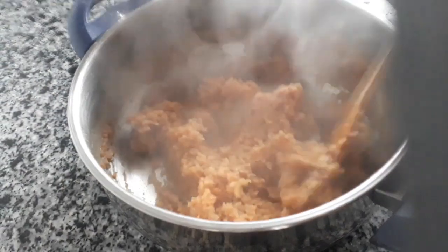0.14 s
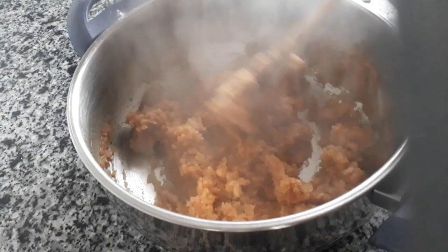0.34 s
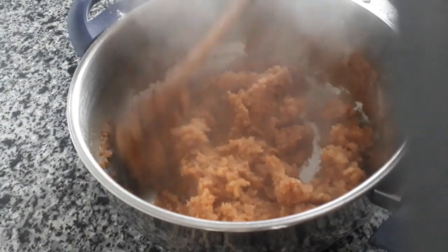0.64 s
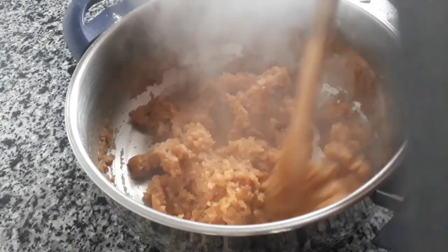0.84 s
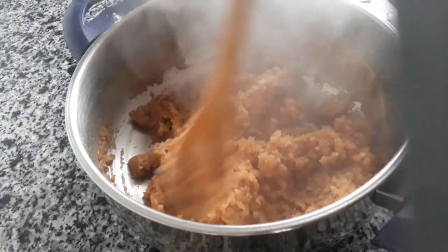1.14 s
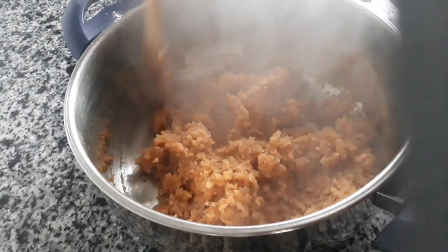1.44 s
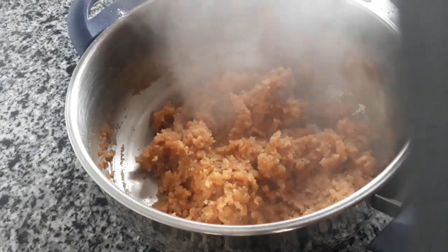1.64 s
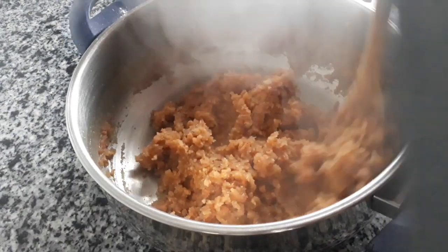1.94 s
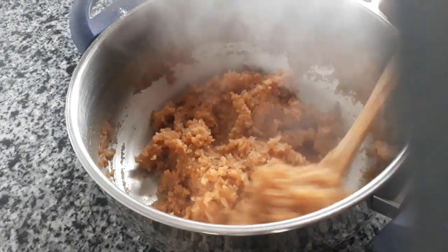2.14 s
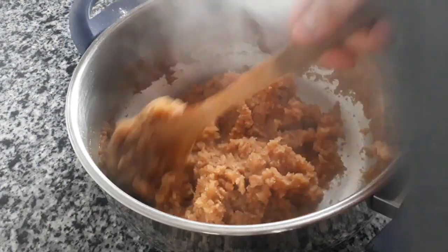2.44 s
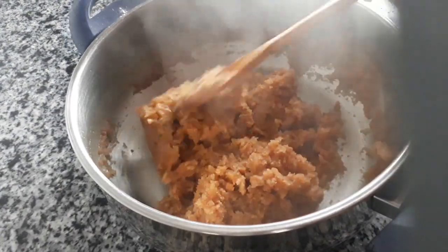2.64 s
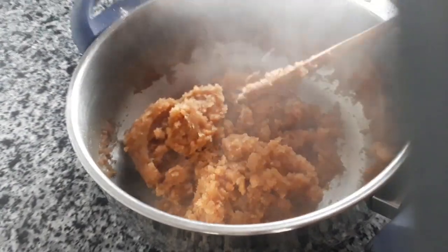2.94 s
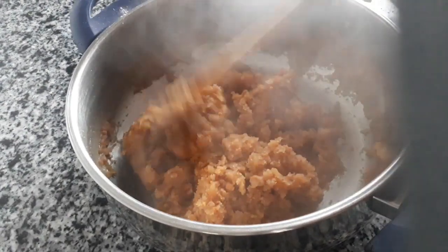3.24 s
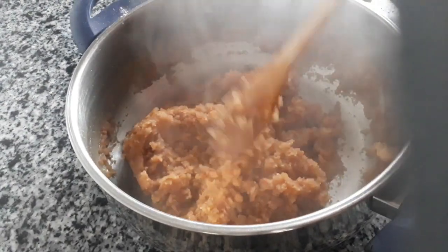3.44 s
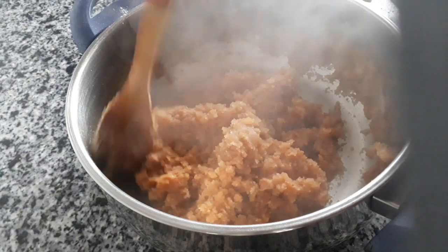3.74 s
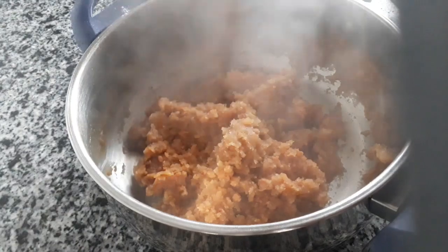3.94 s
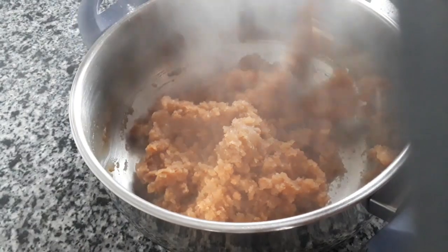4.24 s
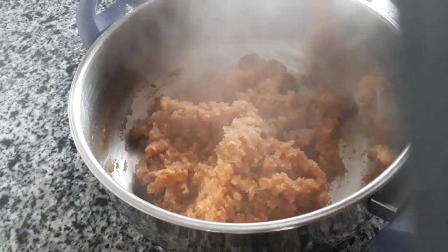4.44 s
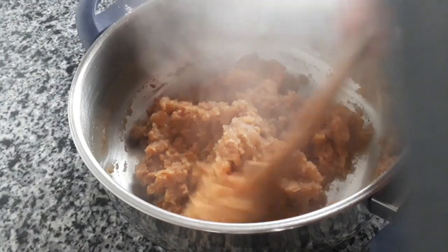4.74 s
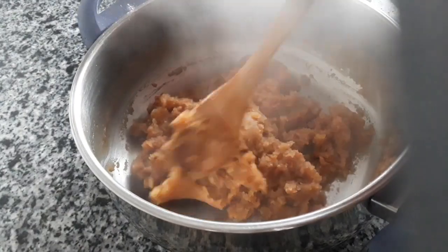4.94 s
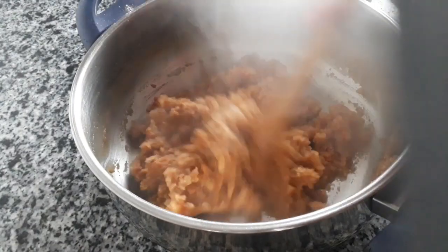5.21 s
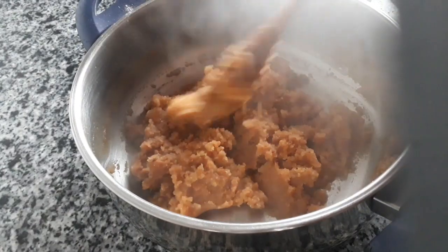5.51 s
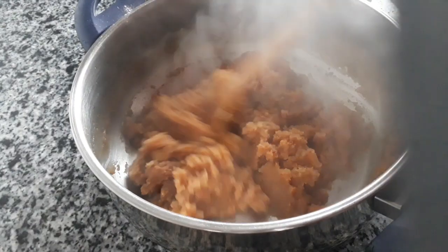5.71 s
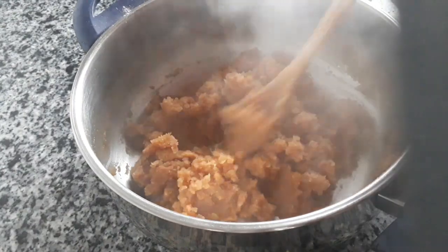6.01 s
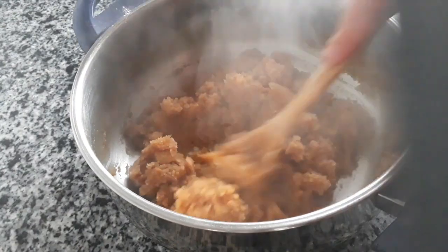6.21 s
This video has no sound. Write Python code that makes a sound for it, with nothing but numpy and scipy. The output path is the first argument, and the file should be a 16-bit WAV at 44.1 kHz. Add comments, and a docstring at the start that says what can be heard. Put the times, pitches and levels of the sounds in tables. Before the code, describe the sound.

A wooden spoon stirs thick, faintly sizzling food in a steel pot, with dull knocks and one ringing rap on the rim.

```python
"""Soft, dull knocks and a sticky rustle come first: a wooden spoon stirs thick, steaming food in a
stainless steel pot on a stone counter, in a small kitchen with hard walls. The food muffles the
knocks on the pot's wall. One rap on the bare rim, to shake off a lump, clangs and leaves the steel
ringing; then the spoon scrapes along the side and stirs on. All the while the food rustles, hisses
on the hot steel and pops faintly, with thin whistles of steam over a quiet room."""
import sys
import numpy as np
from scipy import signal
from scipy.fft import rfft, irfft
from scipy.io import wavfile
from scipy.ndimage import map_coordinates

SR = 44100
rng = np.random.default_rng(int(sys.argv[2]) if len(sys.argv) > 2 else 0)


def inscribe(sig):
    """Save sig as 16-bit PCM at rate SR to the path in sys.argv[1].

    A 1-D sig is mono; a 2-D sig holds one channel per row.
    Samples are clipped to [-1, 1] before scaling.
    """
    pcm = np.round(np.clip(np.atleast_2d(sig).T, -1, 1) * 32767)
    wavfile.write(sys.argv[1], SR, pcm.astype(np.int16))


N = 280917
T = np.arange(int(SR * .7)) / SR  # the clock for one short sound [s]

# Each knock on the wall; the spot struck sets how strong each of the wall's four tones is:
# (time [s], thud level [dB], thud pitch [ratio], tone 1 [dB], tone 2 [dB], tone 3 [dB], tone 4 [dB],
#  crack level [dB], room echo [dB])
WALL_KNOCKS = [(0.2038, -49, 0.96, -60.5, -51.5, -59.5, -65, -68, -7.5),
               (0.582, -53.5, 0.72, -99, -68, -52.5, -66, -50, -14),
               (0.7691, -46.5, 0.97, -49, -62.5, -86, -73, -63.5, -8.5),
               (1.2828, -47, 1.005, -53.5, -72, -81, -89, -72, -6),
               (3.712, -53.5, 1.06, -55, -53.5, -56.5, -56.5, -50.5, -7),
               (3.8458, -55, 0.8, -80, -77, -96, -91, -77, -13),
               (4.426, -37.5, 1.02, -41, -42, -46, -47, -60, -6.5),
               (5.1484, -41.5, 1.035, -48.5, -49.5, -57.5, -67.5, -67.5, -8),
               (6.181, -68.5, 1.1, -84, -99, -93, -82, -87, -13)]
# The wall's tones, cut short by the food: (pitch [Hz], time to fade by 60 dB [s])
WALL_TONES = [(735, 0.026), (1090, 0.012), (1590, 0.011), (2150, 0.0019)]
# The tone colour of wood cracking on steel, before tilting: (frequency [Hz], level [dB])
CRACK_COLOUR = [(1500, -18), (3700, -13), (4650, -2.5), (5400, -3.5), (6700, 2), (9500, -7.5),
                (11500, -0.5), (15500, -13)]
# The wooden spoon's own tones: (base pitch [Hz], relative level [dB], fade time [s])
SPOON_TONES = [(2313, -2, 0.011), (2850, 1, 0.0058), (3860, -5.5, 0.0062)]
def knocks():
    """The spoon hits the wall: the steel rings briefly, the wood cracks, and the pot's base thuds."""
    out = np.zeros(N)
    for time, thud_db, thud_pitch, *wall_db, crack_db, room_db in WALL_KNOCKS:
        wall = sum(amp(db) * ring([(hz, 0, fade)], attack=0.0013)
                   for (hz, fade), db in zip(WALL_TONES, wall_db))
        add(out, time, kitchen(wall, room_db))
        tilt = 0.44 * (crack_db + 50)  # dB per octave: a harder hit sounds brighter
        spectrum = [(hz, db + tilt * np.log2(hz / CRACK_COLOUR[0][0])) for hz, db in CRACK_COLOUR]
        add(out, time, amp(crack_db) * crack(spectrum, fade=0.02, room_db=room_db + 12.5, pot_db=8.5))
        # the spoon's clack is louder when the wall's highest tone is
        clack = amp(wall_db[-1] - 3.5) * ring(SPOON_TONES, attack=0.00032, pitch=0.846)
        add(out, time + 0.002105, kitchen(clack, room_db))
        jolt = amp(thud_db) * thud(attack=0.0027, pitch=thud_pitch)
        add(out, time + 0.00582, kitchen(jolt, room_db + 0.5))
    return out


# The rap on the rim and its bounce:
# (time [s], clang level [dB], clack level [dB], ring level [dB], thud level [dB], thud delay [s])
RIM_RAPS = [(2.9182, -28, -49.5, -41.5, -34, .0065), (2.9843, -42.5, -41, -69.5, -33.5, -.0045)]
# The tone colour of the clang: (frequency [Hz], level [dB])
CLANG_COLOUR = [(100, -34), (550, -1), (850, -8), (1200, -5), (1700, -3.5), (2350, 1.5), (2750, -5.5),
                (3100, -13.5), (3900, -18), (5200, -9), (6500, -9), (8000, -17), (9700, -24.5),
                (15000, -31)]
# The long tones of the pot's steel shell: (pitch [Hz], relative level [dB], fade time [s])
SHELL_TONES = [(149.4, -4, 0.29), (248, 3, 0.46), (354, -8.5, 0.65), (438, 6, 0.2), (728, 7.5, 0.4),
               (1086, -5, 0.35), (1330, -22, 0.51), (1863, -6, 0.18), (2030, -7, .3), (2025, -11, .33),
               (2160, -23, .4), (2230, -23, .27), (2530, -3, 0.28), (2355, -5, 0.23), (2760, -17, .28),
               (5730, -19.5, .2), (5666, -12, .22), (6090, -1, 0.17)]
def rim_raps():
    """The bare rim clangs and sets the whole shell ringing while the pot jolts on the counter."""
    out = np.zeros(N)
    for time, clang_db, clack_db, shell_db, thud_db, delay in RIM_RAPS:
        clang = amp(clang_db) * crack(CLANG_COLOUR, fade=0.041, room_db=1, pot_db=1)
        clack = amp(clack_db) * ring(SPOON_TONES, attack=0.00071)
        shell = amp(shell_db) * ring(SHELL_TONES, attack=0.009)
        add(out, time, clang + kitchen(clack, room_db=-7.5) + shell)
        jolt = amp(thud_db) * thud(attack=0.0036, pitch=0.98)
        add(out, time + delay, kitchen(jolt, room_db=-3.5))
    # the first hit also booms in the counter
    boom = amp(-37) * ring([(146, 6.5, 0.14), (162, -5.5, 0.066), (263.5, -6, 0.25)], attack=0.0016)
    add(out, RIM_RAPS[0][0] + .002, kitchen(boom, room_db=-9))
    return out


def crack(spectrum, fade, room_db, pot_db):
    """A hard hit makes one sharp click, then quick echoes inside the pot, then the room's echo."""
    click = np.arange(len(T)) == round(.0006 * SR)
    echoes = burst(fade) * (1 - np.exp(-T / .0008))
    in_pot = amp(pot_db) * echoes / np.linalg.norm(echoes)
    return unit_hit(colour(click + in_pot + amp(room_db) * room_echo(), spectrum))


# The full pot rocking on its base: (base pitch [Hz], relative level [dB], fade time [s])
ROCKING_TONES = [(102.4, -36, 0.6), (162.3, -21, 0.096), (271.7, -17.5, 0.13), (361, 1.5, 0.023),
                 (408, -2, 0.028)]
def thud(attack, pitch):
    """The pot rocks back and forth quickly: a short thud with little deep bass."""
    rocking = ring(ROCKING_TONES, attack, pitch)
    return unit_hit(signal.sosfilt(signal.butter(2, 110, "high", fs=SR, output="sos"), rocking))


# The spoon's pushes along the wall: (loudest time [s], length [s], rub level [dB], grit level [dB])
SCRAPE_PUSHES = [(3.781, 0.024, -67, -57), (3.86, 0.042, -65, -64.5), (3.896, 0.014, -75, -63),
                 (3.987, 0.18, -66, -72), (4.052, 0.021, -62, -63), (4.097, .055, -63.5, -66)]
# The tone colour of the low rubbing: (frequency [Hz], level [dB])
RUB_COLOUR = [(100, -8), (250, -4.5), (400, 3.5), (580, -10.5), (750, -7.5), (1100, -13.5), (1550, -9),
              (2000, -14.5), (2800, -14.5), (4500, -42), (8000, -50)]
# The tone colour of the gritty crust: (frequency [Hz], level [dB])
GRIT_COLOUR = [(1760, -52), (2900, -11), (3650, -11), (4470, -14.5), (5960, -5.5), (7380, -5.5),
               (7800, -10), (8880, -7.5), (9710, -15), (11000, -11.5), (14800, -16), (15500, -15.5)]
def scrape():
    """The spoon's edge sticks and slips over the crust on the wall, making the shell ring faintly."""
    time, length, *levels = np.transpose(SCRAPE_PUSHES)
    rub_gain, grit_gain = [swells(zip(time, length, db), fall=0.77) for db in levels]
    rub = rub_gain * grains(RUB_COLOUR, per_second=1200, spread_db=-0.5)
    grit = grit_gain * grains(GRIT_COLOUR, per_second=11000, spread_db=2.5)
    tones = ring(SHELL_TONES, attack=0.0012)
    shell = signal.fftconvolve(grit + 0.47 * rub, tones / np.linalg.norm(tones))[:N]
    return kitchen(rub + grit, room_db=-8.5) + amp(-15) * shell


# The spoon's strokes through the food:
# (middle time [s], length [s], relative churn [dB], relative rustle [dB], relative hiss [dB])
STIR_STROKES = [(0.02, 0.11, -67.5, -77.5, -78), (0.293, 0.19, -70, -78, -76),
                (0.718, 0.33, -64.5, -74.5, -73.5), (0.953, 0.11, -87, -83, -75.5),
                (1.136, 0.13, -66.5, -76, -96), (1.564, 0.33, -70, -74.5, -77),
                (1.79, 0.17, -62.5, -73.5, -80), (1.996, 0.13, -61.5, -69.5, -74),
                (2.454, 0.17, -65, -77.5, -72), (2.654, 0.1, -62.5, -74, -67.5),
                (3.394, 0.17, -72, -85, -76), (4.277, 0.43, -69.5, -76.5, -78.5),
                (4.499, 0.028, -75, -66, -63), (4.6, 0.071, -66, -70, -72), (4.898, .17, -74, -72, -71.5),
                (5.308, 0.15, -69, -69.5, -70), (5.586, .1, -69, -78.5, -95), (5.85, 0.23, -68, -76, -73),
                (6.335, 0.29, -72.5, -78.5, -76)]
# The tone colour of the thick food churning: (frequency [Hz], level [dB])
CHURN_COLOUR = [(41, -48), (70, -4), (107, 2), (372, -9), (570, -12.5), (718, -7.5), (874, -18),
                (1100, -14), (1430, -42.5), (2420, -120)]
# The tone colour of its grains rustling: (frequency [Hz], level [dB])
RUSTLE_COLOUR = [(470, -33.5), (800, -8), (1350, 0.5), (1500, -0.5), (2140, -6), (2700, -2.5),
                 (5500, -10.5), (7150, -37), (12100, -120)]
# The tone colour of wet food on hot steel: (frequency [Hz], level [dB])
HISS_COLOUR = [(2350, -21), (4000, -13), (5280, -10), (5980, -1.5), (7130, -2.5), (8890, -5.5),
               (9570, -11.5), (11500, -6.5), (14900, -8), (15500, -6)]
def stirring():
    """With each stroke the food churns, rustles, and hisses and crackles on freshly bared hot steel."""
    time, length, *levels = np.transpose(STIR_STROKES)
    resting_db = (-74, -82.5, -81.5)  # relative churn, rustle and hiss between strokes
    churn_gain, rustle_gain, hiss_gain = [np.hypot(amp(rest), swells(zip(time, length, db)))
                                          for db, rest in zip(levels, resting_db)]
    churn = amp(-7.5) * churn_gain * grains(CHURN_COLOUR, per_second=240, spread_db=-2.5)
    rustle = amp(-2.5) * rustle_gain * grains(RUSTLE_COLOUR, per_second=3000, spread_db=1)
    sizzle = amp(-1.5) * grains(HISS_COLOUR, per_second=12000, spread_db=2.6)
    crackle = amp(-4.5) * grains(HISS_COLOUR, per_second=320, spread_db=1)
    return kitchen(churn + rustle + hiss_gain * (sizzle + crackle), room_db=-5)


# Small sticky pops: (time [s], peak level [dB], pitch [Hz], life [cycles], snap against tone [dB])
FOOD_POPS = [(0.021, -58, 5700, 1.7, -3), (0.4503, -42.5, 2340, 0.41, 7.5), (1.346, -41.5, 2850, 0.73, -24),
             (1.462, -53, 13000, 2, -14), (1.746, -52, 6100, 0.69, -9), (1.786, -52, 1790, 0.37, 6),
             (2.382, -48.5, 860, 0.53, -4), (2.52, -56, 4660, 3, -22), (2.571, -54, 4740, 1.7, -6),
             (3.1852, -45, 4090, 2, -11), (3.1872, -48.5, 7330, 5.9, -3), (4.039, -49, 5900, 2.8, -8),
             (4.805, -52, 3540, 2.2, -17), (5.778, -56.5, 2010, .7, -8), (6.22, -45, 1330, 1.3, -26)]
# The tone colour of a pop's snap: (frequency [Hz], level [dB])
SNAP_COLOUR = [(1000, -23), (1600, 6.5), (3600, -6), (4400, -11), (5500, 3), (6600, -28), (7400, -1.5),
               (9000, -23), (10800, -10), (15000, -14)]
def pops():
    """Little pockets of steam in the sticky food snap open, each with a very short tone."""
    out = np.zeros(N)
    for time, db, hz, cycles, snap_db in FOOD_POPS:
        fading = np.exp(-T * hz / cycles)
        pocket = np.sin(2 * np.pi * hz * T) * fading * (1 - fading)
        snap = colour(burst(fade=0.0039), SNAP_COLOUR)
        pop = unit_hit(pocket) + amp(snap_db) * unit_hit(snap)
        add(out, time, amp(db) * pop / np.abs(pop).max())
    return kitchen(out, room_db=-15)


# The tone colour of seeping steam: (frequency [Hz], level [dB])
STEAM_COLOUR = [(2500, -28), (3400, -12), (3700, -3), (4050, -18), (6000, -13), (6600, -3), (7300, 0),
                (7800, -9), (9000, -28)]
# Thin whistles of steam: (middle time [s], length [s], level before wavering [dB], pitch [Hz])
STEAM_WHISTLES = [(0.398, 0.066, -78.5, 7000), (0.425, 0.18, -82, 3650), (0.507, 0.04, -72, 7000),
                  (0.685, 0.22, -80, 6930), (1.15, 0.42, -86.5, 7060), (1.237, 0.1, -81.5, 3660),
                  (1.92, 0.25, -81, 2770), (4.91, .14, -79, 6360), (5.35, 0.19, -77.5, 7240),
                  (5.887, 0.082, -76, 7200)]
def steam():
    """Steam seeps out under the food and now and then squeezes through a gap in a wavering whistle."""
    out = amp(-87.5) * grains(STEAM_COLOUR, per_second=5200, spread_db=8.5)
    width = 0.032  # a whistle is noise within this share of its pitch, either side
    for time, length, db, hz in STEAM_WHISTLES:
        band = signal.butter(2, [hz * (1 - width), hz * (1 + width)], "band", fs=SR, output="sos")
        whistle = signal.sosfilt(band, rng.standard_normal(N))
        out += swells([(time, length, db)]) * unit(whistle)
    return out * amp(2.5 * wobble(per_second=24))


# How long the kitchen's echo lasts: (frequency [Hz], fade time [s])
ECHO_FADES = [(100, 0.42), (300, 0.34), (1000, 0.49), (2500, 0.42), (6000, 0.34), (14000, 0.24)]
def room_echo():
    """Sound bounces between the hard walls and blurs into a short tail, scaled to energy 1."""
    hz, t, bands = signal.stft(rng.standard_normal(len(T)), SR, nperseg=256)
    fading = np.exp(-np.log(1000) * t / value_at(ECHO_FADES, hz)[:, None])
    tail = signal.istft(bands * fading, SR, nperseg=256)[1][:len(T)]
    tail *= 1 - np.exp(-(T / 0.0037) ** 2)  # the echo takes a moment to build
    return tail / np.linalg.norm(tail)


def kitchen(x, room_db):
    """A sound together with its echo from the kitchen walls."""
    return x + amp(room_db) * signal.fftconvolve(x, room_echo())[:len(x)]


# The tone colour of the quiet room: (frequency [Hz], level [dB])
ROOM_COLOUR = [(20, -3.5), (45, -7), (70, -0.5), (110, -4), (350, -1), (700, -7.5), (1600, -10),
               (5000, -16), (7200, -21.5), (9500, -23.5), (11200, -18), (15500, -22)]
def quiet_room():
    """A faint, steady hush lies behind everything."""
    return amp(-73) * unit(colour(rng.standard_normal(N), ROOM_COLOUR))


def amp(db):
    """Turn decibels into a number to multiply by."""
    return 10 ** (np.asarray(db) / 20)


def unit(x):
    """Scale a sound to an average strength (rms) of 1."""
    return x / np.sqrt(np.mean(x ** 2) + 1e-20)


def unit_hit(x):
    """Scale a hit to the energy of 25 ms of sound at strength 1."""
    return x * np.sqrt(SR / 40 / np.sum(x ** 2))


def value_at(points, hz):
    """Read between (frequency, value) points, with octaves evenly spaced."""
    freqs, values = np.transpose(points)
    return np.interp(np.log(hz + 1), np.log(freqs + 1), values)


def add(track, time, x):
    """Mix x into the track at a time in seconds."""
    start = max(0, round(time * SR))
    track[start:start + len(x)] += x[:N - start]


def colour(x, spectrum):
    """Filter x to give it a tone colour: some frequencies louder, others softer."""
    size = 8192
    db = np.maximum(value_at(spectrum, np.fft.rfftfreq(size, 1 / SR)), -120)
    cepstrum = irfft(np.log(amp(db)))
    # fold the second half onto the first, so the filter never rings before the sound arrives
    cepstrum[1:size // 2] *= 2
    cepstrum[size // 2 + 1:] = 0
    response = irfft(np.exp(rfft(cepstrum)))
    return signal.fftconvolve(x, response)[:len(x)]


def ring(tones, attack, pitch=1):
    """A struck thing's tones swell over the attack time [s], then each drops 60 dB per fade time."""
    x = sum(amp(db - 60 * T / fade) * np.sin(2 * np.pi * pitch * hz * T) for hz, db, fade in tones)
    return unit_hit(x * (1 - np.exp(-T / attack)) ** 2)


def burst(fade):
    """Noise that drops by 60 dB in the fade time [s]."""
    return rng.standard_normal(len(T)) * np.exp(-np.log(1000) * T / fade)


def grains(spectrum, per_second, spread_db):
    """Many tiny snaps of uneven size at random times, scaled to strength 1."""
    sizes = rng.standard_normal(N) * amp(spread_db * np.minimum(rng.exponential(size=N), 4))
    happens = rng.random(N) < per_second / SR
    return unit(colour(sizes * happens, spectrum))


def swells(events, fall=1):
    """A smooth hump of loudness per (time, length, level); fall is fading time over swelling time."""
    t = np.arange(N) / SR
    power = np.zeros(N)
    for time, length, db in events:
        rise = length / (1 + fall)
        width = np.where(t < time, rise, rise * fall)
        power += amp(db) ** 2 * np.exp(-((t - time) / width) ** 2)
    return np.sqrt(power)


def wobble(per_second):
    """A smooth curve through evenly spaced random points."""
    points = rng.standard_normal(int(N * per_second / SR) + 4)
    return map_coordinates(points, [np.arange(N) * per_second / SR])


def scene():
    """The spoon, the pot and the food over the quiet room, in one channel."""
    return (quiet_room() + knocks() + rim_raps() + pops() + scrape() + stirring() + steam())[None]


def record(dry):
    """The recorder thins the deep bass and cuts off the very highest treble."""
    low_hz, top_hz = 45.7, 15600
    thinned = signal.sosfilt(signal.butter(1, low_hz, "high", fs=SR, output="sos"), dry)
    return signal.sosfilt(signal.ellip(10, .1, 70, top_hz, fs=SR, output="sos"), thinned)


dry = scene()
out = record(dry)
inscribe(out)
```